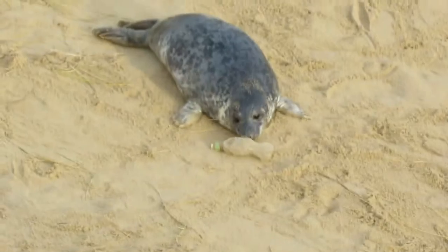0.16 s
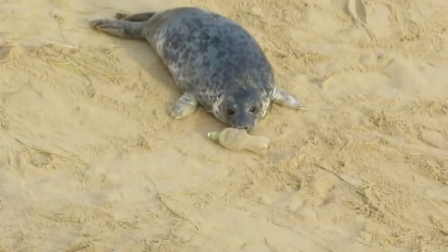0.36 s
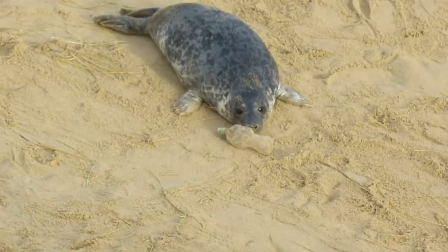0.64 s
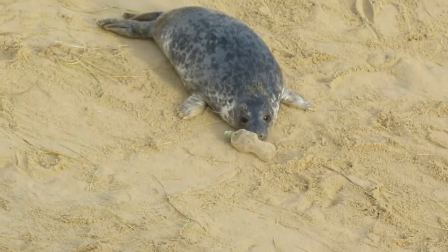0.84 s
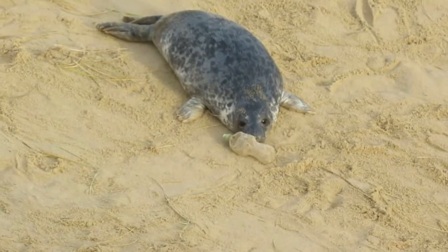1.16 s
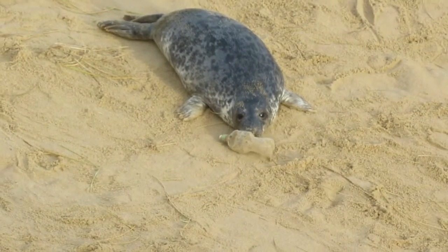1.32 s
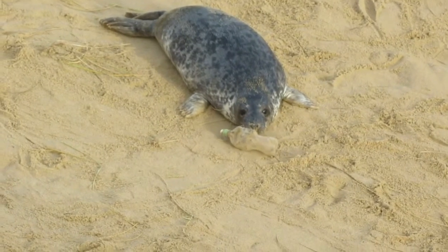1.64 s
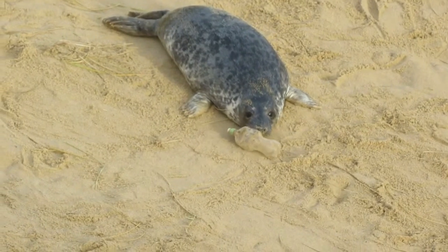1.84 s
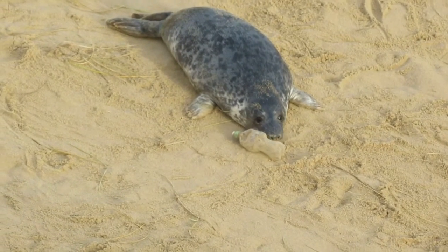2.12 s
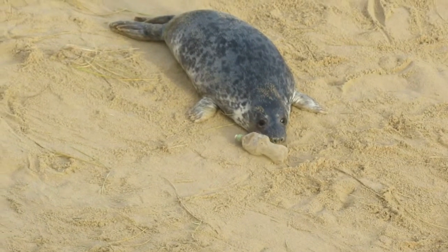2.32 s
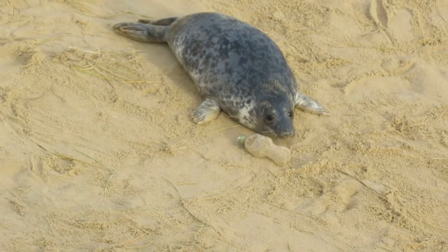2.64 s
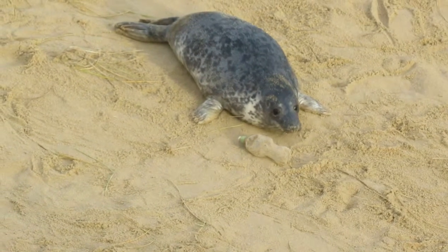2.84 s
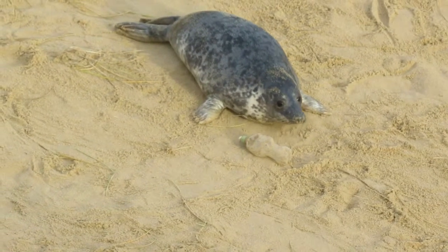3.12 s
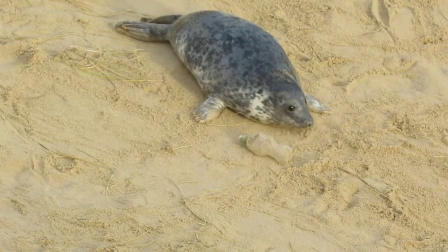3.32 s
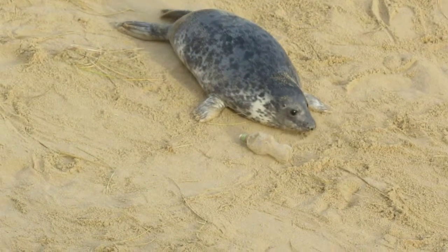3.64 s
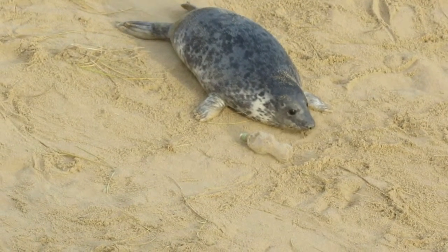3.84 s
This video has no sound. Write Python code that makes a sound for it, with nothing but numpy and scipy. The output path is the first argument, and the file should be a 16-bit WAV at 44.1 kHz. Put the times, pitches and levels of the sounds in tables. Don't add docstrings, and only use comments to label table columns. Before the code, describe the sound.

Strong wind buffets a microphone in low rumbling thumps over the hiss of surf on a beach.

```python
import sys
import numpy as np
from scipy import signal
from scipy.fft import rfft, irfft, next_fast_len
from scipy.io import wavfile

SR = 44100
rng = np.random.default_rng(int(sys.argv[2]) if len(sys.argv) > 2 else 0)


def elevation(decibels):
    levels = np.asarray(decibels, float)
    return 10 ** (levels / 20)


def log_audio(samples):
    frames = np.atleast_2d(samples).T
    limited = np.clip(frames, -1, 1)
    pcm = np.round(limited * 32767).astype(np.int16)
    wavfile.write(sys.argv[1], SR, pcm)


N = 175077


def in_time(rows):
    s, *columns = np.transpose(rows)
    return [np.interp(np.arange(N) / SR, s, c) for c in columns]


def at_hz(points, hz):
    f, *columns = np.transpose(points)
    return [np.interp(np.log(hz), np.log(f), c) for c in columns]


def rms_one(x):
    return x / np.sqrt(np.mean(x ** 2) + 1e-20)


def drift(rate_hz):
    step, settle = 40, 2000
    r = np.exp(-2 * np.pi * rate_hz * step / SR)
    noise = rng.standard_normal(N // step + settle + 2)
    slow = signal.lfilter([1], [1, -2 * r, r * r], noise)[settle:]
    return np.interp(np.arange(N) / step, np.arange(len(slow)), rms_one(slow))


# time in seconds, level in dB, extra brightness in dB.
WASH = [(0.07, -42, 0.5), (0.21, -42.5, 0), (0.44, -43.5, 0), (0.61, -47, 0), (0.95, -48.5, 0.5),
        (1.23, -52.5, -1.5), (1.69, -50, -0.5), (1.8, -53, -0.5), (2.13, -51, -0.5), (2.2, -55.5, -3),
        (2.64, -51.5, -1.5), (2.86, -44.5, -3.5), (3.0, -46.5, -2.5), (3.6, -44.5, -2), (3.64, -41, 0.5),
        (3.91, -42.5, -1), (3.97, -39.5, 0.5)]
# time in seconds, extra lead at the right port in us.
CREST_BEARING = [(0, 0.1), (2.2, 6), (2.75, 24), (3.3, 32), (3.65, 14), (3.97, 6)]
# frequency in Hz, gain in dB.
SURF_RIGHT = [(150, 3.5), (800, 0), (1150, -2), (2900, -4.5), (3600, -17), (5000, -11), (9000, -23),
              (15200, -41.5)]
# frequency in Hz, gain in dB.
SURF_LEFT = [(150, 12.5), (400, -3.5), (900, -6), (1150, -11.5), (2500, -17.5), (7000, -19.5),
             (10000, -28.5), (15200, -42.5)]
# frequency in Hz, likeness from 0 to 1, right leads in rad.
PORTS = [(500, 0.89, 0.76), (880, 0.84, 0.96), (1300, .4, 1.4), (1650, 0.63, 0.37), (2310, 0.2, 4),
         (3700, 0.47, 6.22), (9000, 0.68, 7.1), (15000, 0.2, 7.4)]
SURF_DB, SWELL_DB, PATCH_DB = 7, 0.67, 0.15
SURF_TOP_HZ, BAND_BASE_HZ, BANDS = 15000, 250, 13


def surf():
    wash_db, bright_db = in_time(WASH)
    lead_us, = in_time(CREST_BEARING)
    size = next_fast_len(N)
    hz = np.maximum(np.fft.rfftfreq(size, 1 / SR), 1)
    body = hz ** 2 / (hz ** 2 + 230 ** 2) * (hz < SURF_TOP_HZ)
    near, other = rfft(rng.standard_normal((2, size))) * body
    alike, lead_rad = at_hz(PORTS, hz)
    alike = np.clip(alike, 0, 1)
    right = alike * near * np.exp(1j * lead_rad) + np.sqrt(1 - alike ** 2) * other
    right = right * elevation(at_hz(SURF_RIGHT, hz)[0])
    left = near * elevation(at_hz(SURF_LEFT, hz)[0])
    place = np.clip(2 * np.log2(hz / BAND_BASE_HZ), 0, BANDS - 1)
    swell = SWELL_DB * (drift(3.6) + 0.2 * drift(20))
    out = 0
    for k in range(BANDS):
        share = np.clip(1 - np.abs(place - k), 0, 1)
        band_hz = BAND_BASE_HZ * 2 ** (k / 2)
        turn = np.exp(2j * np.pi * band_hz * lead_us / 1e6)
        left_band = irfft(left * share, size)[:N]
        right_band = 2 * (np.fft.ifft(right * share, size)[:N] * turn).real
        gain_db = swell + PATCH_DB * drift(5.4) + (k - 6) / 4 * bright_db
        out = out + np.array([left_band, right_band]) * elevation(gain_db)
    return elevation(wash_db + SURF_DB) * rms_one(out)


# time in seconds, gain change in dB.
DUCKS = [
    (.158, -3.5),
    (.555, -1.5),
    (1.18, -0.5),
    (2.145, 1.5),
]
DUCK_ATTACK_S, DUCK_RELEASE_S = 0.005, 0.25


def ducking_db():
    start_s, depth_db = np.array(DUCKS).T[:, :, None]
    t = np.maximum(np.arange(N) / SR - start_s, 0)
    return np.sum(depth_db * (1 - np.exp(-t / DUCK_ATTACK_S)) * np.exp(-t / DUCK_RELEASE_S), axis=0)


TICK_S, TICK_DB, TICK_HZ, TICK_MS, TICK_FALL_HZ_PER_MS = 3.7463, -27, 4300, .38, 300


def tick():
    ms = (np.arange(N) / SR - TICK_S) * 1000
    cycles = (TICK_HZ * ms - TICK_FALL_HZ_PER_MS * ms ** 2 / 2) / 1000
    bell = np.exp(-.5 * (ms / TICK_MS) ** 2)
    left_right_db = [[-1.5], [2.5]]
    return elevation(TICK_DB) * np.sin(2 * np.pi * cycles) * bell * elevation(left_right_db)


LOW_CUT_HZ, SUBSONIC_HZ = 67.4, 25


def low_cut(x):
    deep = signal.sosfiltfilt(signal.butter(1, SUBSONIC_HZ, "high", fs=SR, output="sos"), x)
    return signal.sosfilt(signal.butter(2, LOW_CUT_HZ, "high", fs=SR, output="sos"), deep)


# time in seconds, depth in dB, width in ms.
BUFFETS = [(.101, 2, 1.4), (0.1348, 4.5, 0.82), (0.158, 2, 0.55), (0.4193, -1.5, 0.39), (0.518, -42, .8),
           (0.596, -2.5, 0.64), (0.6753, 0.5, 0.69), (.9141, -13, 1.5), (0.9646, 0, .7), (1.034, -1.5, .8),
           (1.0717, -16, 0.35), (1.1078, -2, 0.56), (1.1667, 1.5, 0.83), (1.1785, -5, 0.64),
           (1.199, 1.5, 0.78), (1.2464, 4, 1.04), (1.4393, -2.5, 0.55), (1.4928, -9, 0.47),
           (1.7084, 1, 0.76), (2.1437, 0.5, 0.52), (2.4071, -4, .8), (2.5845, -8, 1.3),
           (2.7901, -2.5, 1.02), (2.8541, -3.5, 1.1), (2.984, -8, 0.96), (3.1354, -17, 1.1),
           (3.5984, -10, 0.97), (3.682, -13, 1.6), (3.6974, -5, 1.9), (3.7706, -12, 1.3)]


def buffets():
    reach = 400
    out, t = np.zeros(N), np.arange(-reach, reach + 1) / SR
    for s, depth_db, width_ms in BUFFETS:
        i = int(s * SR)
        ms = (t - s + i / SR) * 1000
        out[i - reach:i + reach + 1] -= elevation(depth_db) * np.exp(-.5 * (ms / width_ms) ** 2)
    return out


# corner in Hz, level in dB, gust following in dB per dB, flutter share.
EDDIES = [
    (55.7, -5.5, 0.32, 0.9),
    (110.5, 5.5, 0.88, 0.37),
    (178.1, -0.5, 1.03, 1.05),
    (270.6, -9.5, 1.34, 1.24),
    (398, -25, 2.4, 1.06),
    (655, -38.5, 0.54, 2.3),
]
EDDIES_PER_S, EDDY_SPREAD_DB, SUCTION_SHARE = 240, 2.2, .75
OWN_FLUTTER_DB = 1.3
COARSE = 8


def eddies(gust_db, fine_db, flutter_db):
    rate, settle = SR / COARSE, 2000
    size = N // COARSE + settle + 1
    out = 0
    for k, (hz, level_db, follows, share) in enumerate(EDDIES):
        born = rng.random(size) < EDDIES_PER_S * np.sqrt(hz / 100) / rate
        sizes = elevation(EDDY_SPREAD_DB * np.minimum(rng.exponential(1, size), 4))
        signs = np.where(rng.random(size) < SUCTION_SHARE, -1, 1)
        bell = signal.bessel(4, hz, fs=rate, output="sos", norm="mag")
        dips = signal.sosfilt(bell, born * sizes * signs + 1e-18)[settle:]
        own_flutter_db = OWN_FLUTTER_DB * drift(12.8)
        gain_db = level_db + follows * gust_db + share * (flutter_db + own_flutter_db) + (k - 1) * fine_db
        out = out + elevation(gain_db[::COARSE]) * rms_one(dips - dips.mean())
    return signal.resample_poly(out, COARSE, 1)[:N]


# time in seconds, rumble level in dB, fineness of the eddies in dB.
GUST = [(.07, -27, -3.5), (.12, -20.5, -1.5), (.24, -23.5, -2.5), (.6, -25, .5), (1.2, -24.5, 0),
        (1.4, -29.5, 1), (1.78, -23, -3), (2.0, -30, 0), (2.14, -23.5, 0), (2.26, -35, 0.5), (2.4, -30, 0),
        (2.72, -34.5, -2), (2.85, -31, -4.5), (3.19, -38, 4), (3.22, -42, -2), (3.44, -48.5, -4),
        (3.7, -34.5, -1.5), (3.97, -44.5, -2)]
WIND_DB, FLUTTER_DB, FLUTTER_HZ = 12.5, 3.0, 12.0
SQUASH = .62
LEFT_DB, LEFT_PORT_DB, LEAK_DB, LEFT_DULL_HZ = -5.7, -11.0, -22.0, 900


def wind():
    gust_db, fine_db = in_time(GUST)
    mean_db = gust_db.mean()
    swing_db = gust_db - mean_db
    flutter_db = -FLUTTER_DB * np.maximum(drift(FLUTTER_HZ), 0) ** 2
    right = low_cut(eddies(swing_db, fine_db, flutter_db))
    left = low_cut(eddies(swing_db, fine_db, flutter_db))
    level = elevation(mean_db + WIND_DB) / np.sqrt(np.mean((right / elevation(swing_db)) ** 2))
    right = SQUASH * np.tanh(level * right / SQUASH) + low_cut(buffets())
    left = level * left
    mirrored = signal.sosfiltfilt(signal.butter(1, LEFT_DULL_HZ, fs=SR, output="sos"), right)
    left_out = elevation(LEFT_PORT_DB) * left - elevation(LEFT_DB) * mirrored
    right_out = right - elevation(LEAK_DB) * left
    return np.array([left_out, right_out])


def scene():
    return elevation(ducking_db()) * surf() + tick() + wind()


def band_limit(x):
    return signal.sosfilt(signal.butter(12, 15700, fs=SR, output="sos"), x)


START_S, CEILING = .0613, .995


def record(dry):
    on = np.arange(N) / SR > START_S
    mix = np.clip(dry * on, -CEILING, CEILING)
    return band_limit(mix)


dry = scene()
out = record(dry)
log_audio(out)
```